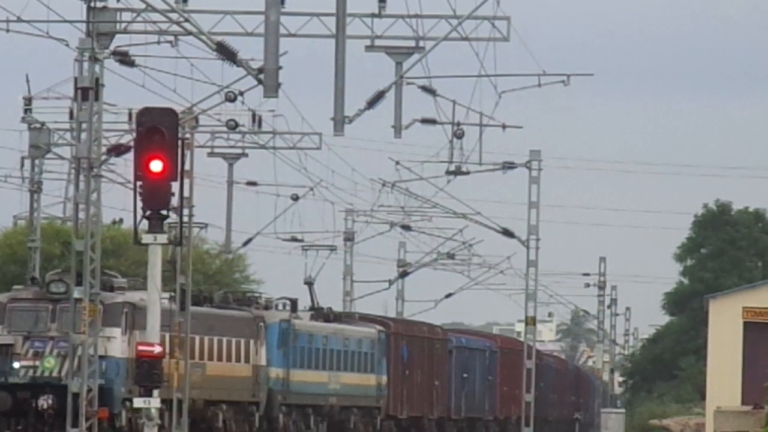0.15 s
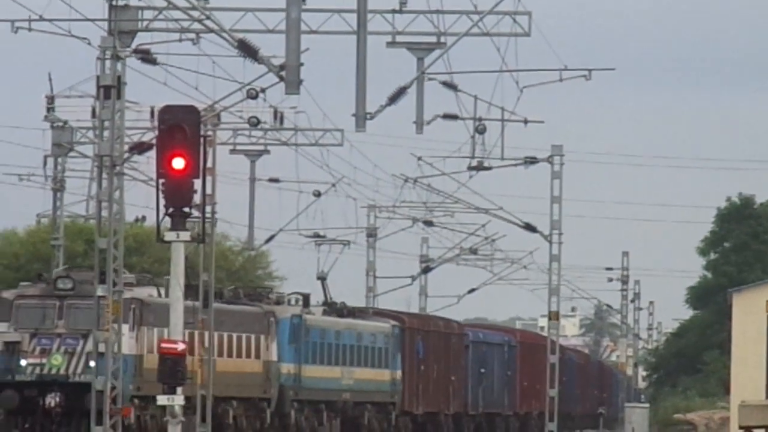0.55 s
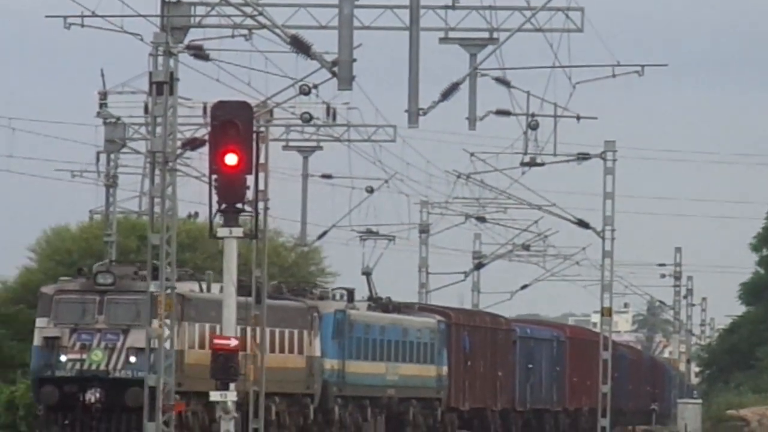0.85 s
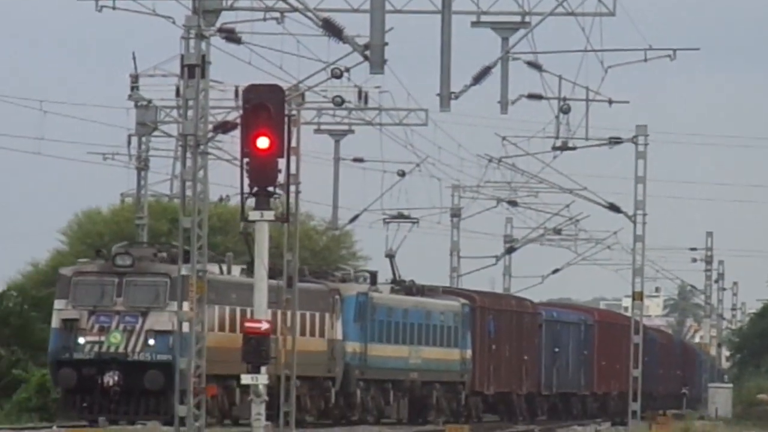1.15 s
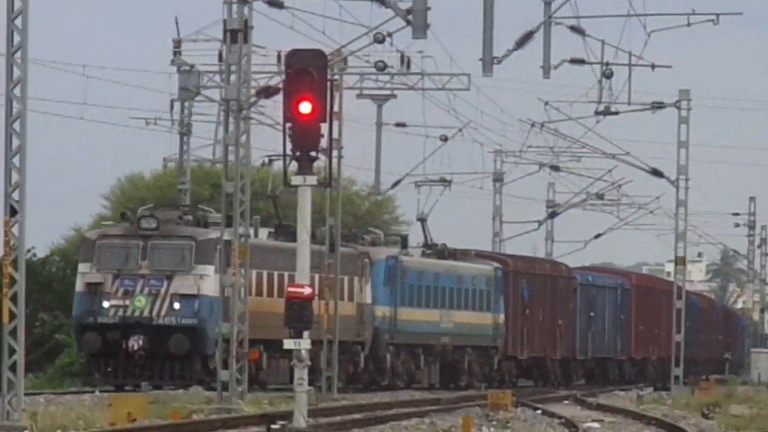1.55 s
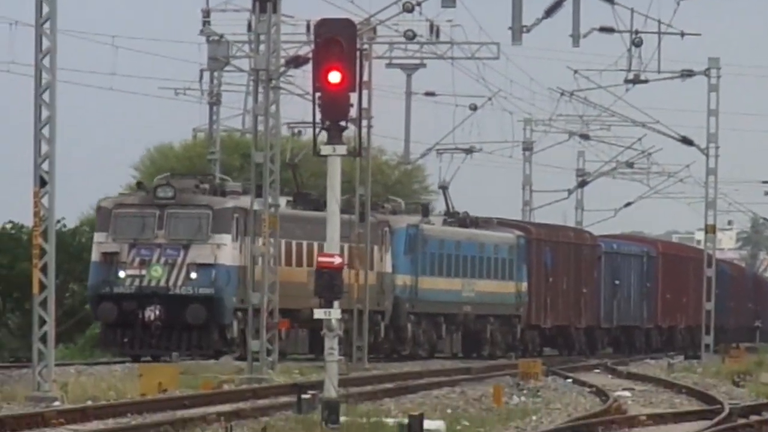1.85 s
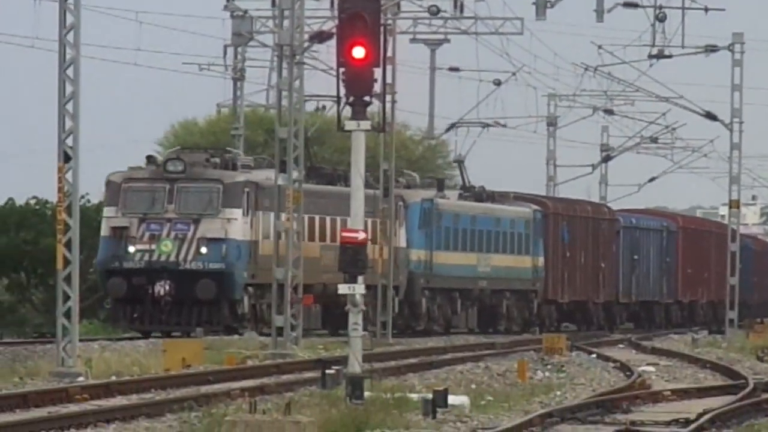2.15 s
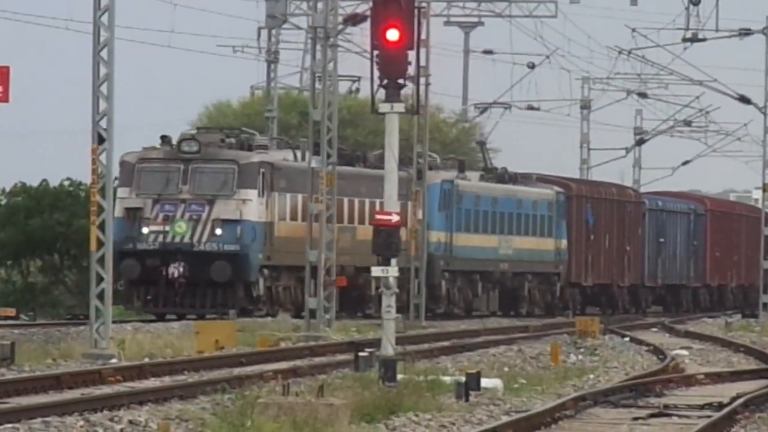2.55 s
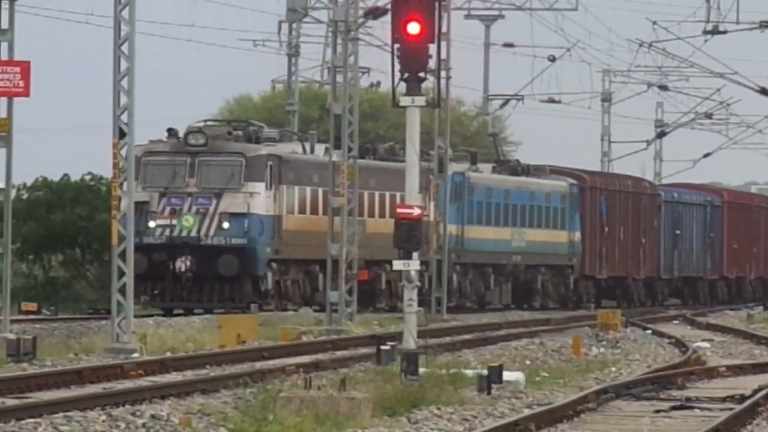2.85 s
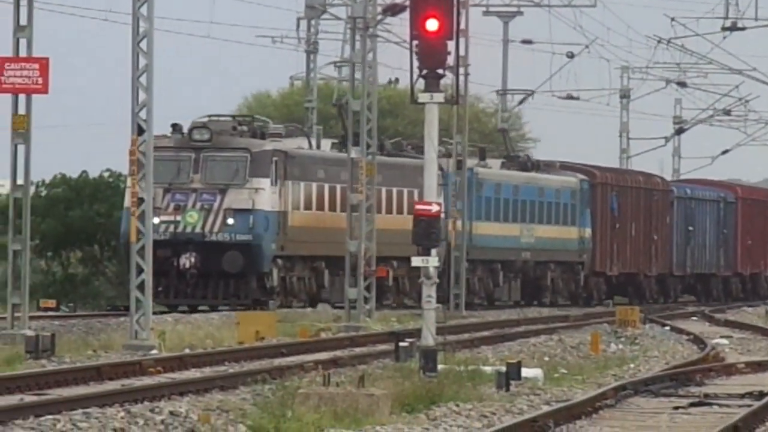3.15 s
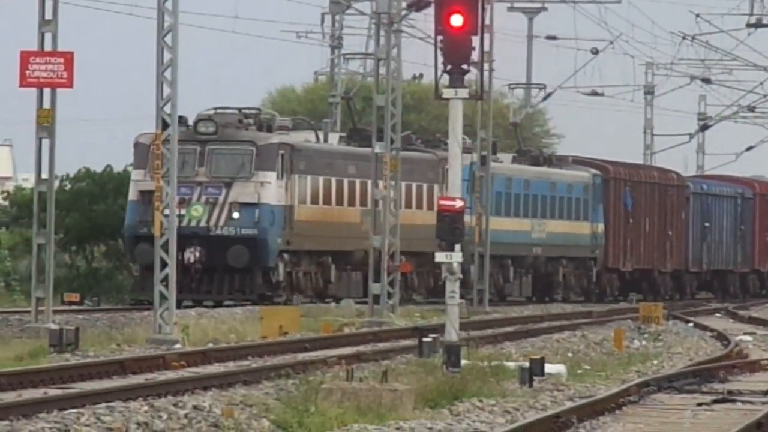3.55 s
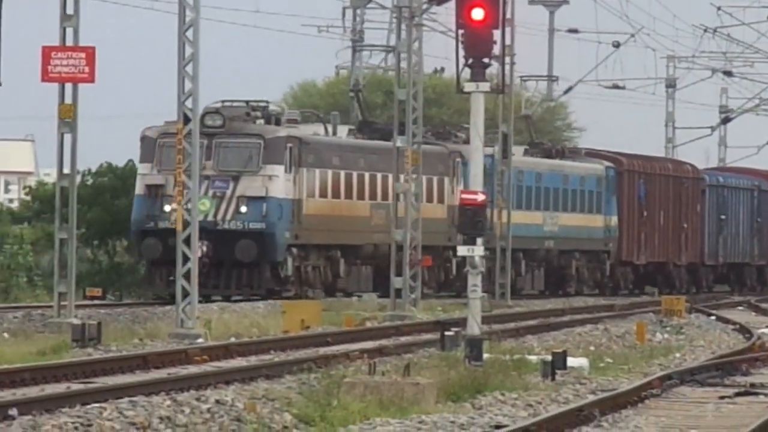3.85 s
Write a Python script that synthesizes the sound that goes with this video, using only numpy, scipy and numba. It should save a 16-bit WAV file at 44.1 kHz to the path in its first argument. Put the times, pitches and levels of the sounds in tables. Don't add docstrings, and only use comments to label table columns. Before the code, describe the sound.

A goods locomotive's air horn bursts in after half a second of faint bird chirps and hiss, holds one long brassy note, dips twice and swells back, echoing across open track while wind buffets the microphone.

```python
import sys
import numpy as np
from scipy import signal
from scipy.fft import rfft, irfft
from scipy.io import wavfile
from scipy.ndimage import uniform_filter1d, map_coordinates
from numba import njit

SR = 44100
rng = np.random.default_rng(int(sys.argv[2]) if len(sys.argv) > 2 else 0)


def rack_gain(trim_db):
    fader = np.asarray(trim_db, float)
    return 10 ** (fader / 20)


def log_audio(samples):
    frames = np.atleast_2d(samples).T
    limited = np.clip(frames, -1, 1)
    pcm = np.round(limited * 32767).astype(np.int16)
    wavfile.write(sys.argv[1], SR, pcm)


N = 176400
OPEN_S = .58

# (time [s], pitch [Hz], level [dB], brightness [dB])
HORN_BLOWING = [(.6, 291.5, -15.5, -30), (.66, 289.2, -14.5, -28), (1.3, 288.8, -15, -23),
                (1.8, 288.7, -16, -22), (2.1, 288.7, -14, -17), (2.3, 288.5, -11.5, -19),
                (2.64, 288.9, -10.8, -16), (2.77, 292.5, -15, -19), (2.87, 295.2, -18.5, -38),
                (2.98, 297.3, -24, -66), (3.035, 292.5, -11, -20), (3.12, 290.3, -9, -17),
                (3.36, 289.2, -8.3, -17), (3.48, 291.8, -12.5, -19), (3.59, 294.8, -19, -34),
                (3.655, 291.8, -12.5, -20), (3.82, 289.5, -11.5, -18), (3.99, 288.6, -11.5, -18)]
# (overtone number, level [dB])
BELL_COLOUR = [(1, -13), (2, -16), (3, 3.5), (4, 1), (5, -8.5), (6, -11.5), (7, -7), (8, -7.5), (9, -13),
               (10, -11.5), (11, -9.5), (12, -13), (13, -11), (14, -10.5), (15, -11.5), (16, -17),
               (18, -15), (22, -22), (25, -24.5), (28, -32.5), (52, -52)]
# (time [s], notch [Hz], notch gain [dB], lobe [Hz], lobe gain [dB])
MOVING_COLOUR = [(.62, 1700, 3.5, 3330, 15), (.82, 1750, 2, 3400, 8.5), (.97, 870, -1.5, 2870, 2.5),
                 (1.12, 1180, 1, 2350, 3.5), (1.4, 840, -5, 2360, 4.5), (1.55, 820, -3, 2870, -0.5),
                 (1.7, 1110, -7.5, 2750, 4), (1.87, 915, -6.5, 3250, 2), (2.02, 930, -12, 3600, 5),
                 (2.2, 970, -3, 3470, 1), (2.45, 1240, -9.5, 3240, 6), (2.62, 1180, -4.5, 3050, 4.5),
                 (2.8, 1270, -7.5, 4030, 3), (3.05, 1293, -18, 4280, 2), (3.2, 1304, -27.5, 3660, 2.5),
                 (3.4, 1286, -13.5, 3700, 10.5), (3.65, 1340, -4.5, 4030, 7.5), (3.9, 1410, -3, 3230, 5.5)]
# (delay [s], growth [s/s], level [dB], low-pass [Hz])
REFLECTIONS = [
    (.0015, 0.000079, -15, 9000),
    (.045, .003, -26, 4000),
    (.11, 0.0085, -18, 3000),
    (.23, .004, -16, 2500),
    (.36, .004, -17.5, 2000),
]
# (time [s], level [dB])
GUST_LEVEL = [(0, -56), (.08, -41.5), (.42, -82), (.49, -40), (.62, -53), (.8, -35.5), (1.14, -39),
              (1.28, -19), (1.35, -34), (1.5, -22.5), (1.8, -24), (1.9, -33.5), (2.14, -35.5), (2.3, -25),
              (2.8, -26), (3.17, -36.5), (3.8, -27.5), (3.88, -22)]
# (frequency [Hz], density [dB/Hz])
WIND_COLOUR = [(25, -26), (60, -8.5), (120, -3.5), (200, 4), (320, -3.5), (500, -19), (800, -21.5),
               (1500, -26.5)]
# (time [s], peak level [dB], centre [Hz])
AIR_THUMPS = [(.068, -37, 155), (.186, -47, 110), (0.441, -37, 190), (.472, -33, 125), (0.488, -29, 208),
              (0.504, -31, 157), (.553, -40, 110), (2.224, -17.5, 275), (2.278, -13, 300), (2.39, -13, 298),
              (2.69, -18.5, 380), (2.738, -14.5, 302), (3.643, -22.5, 286), (.98, -27, 100),
              (1.89, -26, 110), (2.88, -29, 130), (3.3, -32, 400), (0.736, -59, 285), (0.793, -22.5, 145),
              (0.845, -35, 221), (1.034, -23, 208), (1.082, -21, 114), (1.235, -34, 183), (1.377, -23, 175),
              (1.422, -18, 220), (1.471, -13, 235), (1.514, -12.5, 224), (1.595, -13, 280),
              (1.648, -11, 258), (1.719, -16.5, 182), (1.784, -9.5, 166), (2.027, -22, 184.2),
              (2.175, -10.5, 257), (2.332, -16.5, 216), (2.36, -13, 212.3), (2.463, -16.5, 265),
              (2.502, -24, 240), (2.571, -14.5, 202), (2.71, -17, 297), (2.778, -14, 190),
              (2.845, -24, 290), (3.019, -14, 224), (3.473, -22.5, 198), (3.745, -11, 268),
              (3.862, -6.5, 244), (3.942, -46, 519), (3.94, -5, 288)]
# (start [s], length [s], from [Hz], to [Hz], level [dB])
BIRD_SWEEPS = [(.012, .024, 5450, 4260, -45), (.028, .028, 4500, 3100, -62), (.06, .016, 3700, 4100, -52),
               (.07, .016, 4000, 5200, -50), (.08, .014, 5050, 5500, -45), (.09, .012, 5500, 6100, -57),
               (.21, .021, 3850, 4400, -58), (.315, .02, 5530, 4320, -56), (0.33, 0.027, 3820, 3000, -54),
               (.342, .026, 5350, 3700, -47), (0.364, .022, 3550, 4200, -49),
               (0.385, .022, 3550, 5000, -50), (.404, 0.019, 4930, 5550, -47),
               (0.42, .012, 5400, 6000, -55), (0.56, 0.014, 4140, 4420, -52), (0.89, 0.16, 1180, 1410, -41),
               (1.99, .08, 3560, 3000, -39)]
# (centre [Hz], width [Hz], throb rate [1/s], level [dB])
INSECT_BANDS = [(9070, 540, 105, -64.5), (6460, 1200, 330, -66)]
# (frequency [Hz], level [dB])
HUM_TONES = [(495.3, -60), (1276, -63), (2541, -63)]
# (frequency [Hz], density [dB/Hz])
HISS_COLOUR = [(24, -51), (40, 2), (392, -15.5), (490, -12), (527, -10.5), (1290, -12.5), (1920, -20.5),
               (2450, -20), (15000, -32.5)]
# (from [s], to [s], level [dB])
CHANNEL_PARTING = [(.5, .55, -68), (.61, .66, -62), (1.112, 1.302, -53), (1.432, 1.667, -51.5),
                   (2.01, 2.54, -45.5), (2.67, 2.775, -44.5), (3.056, 3.128, -50.5), (3.221, 3.564, -45),
                   (3.617, 3.728, -56), (3.798, 3.951, -45.5)]
# (frequency [Hz], density [dB/Hz])
PARTING_COLOUR = [(24, -35), (40, -12), (1000, -14.5), (1170, -19), (2170, -18), (5850, -15.5),
                  (15000, -32)]
LIMITER_SNAPS = [3.138, 3.205, 3.277, 3.346]


def level(x, db):
    return x * rack_gain(db) / np.sqrt(np.mean(x ** 2))


def curve(table, col):
    a = np.array(table)
    return np.interp(np.arange(N) / SR, a[:, 0], a[:, col])


def walk(rate):
    hold = int(SR / rate)
    steps = np.repeat(rng.standard_normal(N // hold + 1), hold)
    return 1.164 * uniform_filter1d(uniform_filter1d(steps, hold), hold)[:N]


def band(x, hz, width):
    return signal.lfilter(*signal.iirpeak(min(hz, .45 * SR), hz / width, fs=SR), x)


def bands(colour, flick_db, rate, count):
    p = np.array(colour)
    f = np.fft.rfftfreq(N, 1 / SR) + 1
    spectrum = rfft(rng.standard_normal(N)) * rack_gain(np.interp(np.log(f), np.log(p[:, 0]), p[:, 1]))
    half_octaves = 2 * np.log2(f / 25)
    out = 0
    for k in range(count):
        window = np.cos(np.pi / 2 * np.clip(half_octaves - k, -1, 1)) ** 2
        out = out + rack_gain(flick_db * walk(rate)) * irfft(spectrum * window, N)
    return out


def horn(t):
    attack_s, start_hz, jitter_hz = .024, 5, .08
    shimmer_db, flutter_db, grain_db = 1.5, 2.2, 4
    wobble, lean = .3, .65
    smear = .1
    since = np.maximum(t - OPEN_S, 0)
    onset = np.exp(-since / attack_s)
    hz = curve(HORN_BLOWING, 1) + start_hz * onset + jitter_hz * walk(30.33)
    phase = 2 * np.pi * np.cumsum(hz) / SR
    bright = curve(HORN_BLOWING, 3) + 17 - 40 * onset
    shimmer = np.array([walk(5) for _ in range(14)])
    flutter = flutter_db * np.array([walk(15) for _ in range(9)])
    grain = grain_db * np.array([walk(60) for _ in range(11)])
    notch_hz, notch_db, lobe_hz, lobe_db = (curve(MOVING_COLOUR, c) for c in range(1, 5))
    bell = np.array(BELL_COLOUR)
    ripple = 1.55 * rng.standard_normal(53)
    tone, power = 0, 0
    for k in range(1, 53):
        db = np.interp(k, bell[:, 0], bell[:, 1]) + ripple[k] * (k > 22)
        db = db + notch_db * np.exp(-((k * hz - notch_hz) / 137) ** 2)
        db = db + lobe_db * np.exp(-((k * hz - lobe_hz) / 386) ** 2)
        gain = rack_gain(db + .88 * bright * min(k / 25, 1.6))
        power = power + gain ** 2 / 2
        shake_db = (shimmer_db * shimmer[k % 14] + flutter[k % 9]) * (1 + smear * max(k - 12, 0)) ** .5
        shake_db = shake_db + grain[k % 11] * np.clip(k / 12 - 1.5, 0, 1)
        drift = wobble * shimmer[(3 * k + 5) % 14] * (1 + smear * np.clip(k - 5, 0, 12))
        tone = tone + gain * rack_gain(shake_db) * np.sin(k * (phase + np.pi) + np.pi - lean + drift)
    air = band(band(rng.standard_normal(N), 1900, 4500), 1900, 4500)
    air = rack_gain(-38) * (1 + np.cos(phase)) * level(air, 0)
    env = rack_gain(curve(HORN_BLOWING, 2) - .37) * np.clip(since / attack_s, 0, 1) ** 2
    return env * (tone / np.sqrt(power) + air)


def squeal(t):
    start_s, length_s, hz, fall = .495, .095, 1600, .025
    u = np.clip((t - start_s) / length_s, 0, 1)
    phase = 2 * np.pi * np.cumsum(hz * (1 - fall * u)) / SR
    whistle = np.sin(phase) + .82 * np.sin(2 * phase) + band(rng.standard_normal(N), 2700, 2500)
    return rack_gain(-44.5 + 2 * walk(34.5)) * np.sin(np.pi * u) ** .5 * whistle


def reflections(blast, t):
    out = 0
    for delay, growth, db, hz in REFLECTIONS:
        late = map_coordinates(blast, [(t - delay - growth * (t - 2)) * SR], order=3)
        out = out + rack_gain(db) * signal.lfilter(*signal.butter(4, hz, fs=SR), late)
    return out


@njit
def walls(x, lags, gain, damp):
    line, soft, out = np.zeros((8, 8192)), np.zeros(8), np.zeros(len(x))
    for i in range(len(x)):
        total = 0.
        for k in range(8):
            soft[k] += (1 - damp) * (gain[k] * line[k, (i - lags[k]) & 8191] - soft[k])
            total += soft[k]
        out[i] = soft[0] - soft[3] + soft[5] - soft[6]
        for k in range(8):
            line[k, i & 8191] = x[i] + soft[k] - total / 4
    return out


def reverberation(blast):
    t60_s = 1.8
    lags = rng.integers(1500, 8000, 8)
    return rack_gain(-15) * walls(blast, lags, rack_gain(-60 * lags / SR / t60_s), .82)


def wind():
    rumble = bands(WIND_COLOUR, 1, 35, count=13) * rack_gain(4.5 * walk(30))
    return level(rumble, 0) * rack_gain(curve(GUST_LEVEL, 1))


def thumps(t):
    width_s = .0074
    air = signal.lfilter(*signal.butter(4, 850, fs=SR), rng.standard_normal(N))
    out = 0
    for s, db, hz in AIR_THUMPS:
        shape = np.exp(-((t - s - width_s) / width_s) ** 2)
        puff = shape * band(band(air, hz, hz), hz, hz * .79)
        out = out + rack_gain(db - 3) * puff * np.sqrt(np.sum(shape ** 2) / np.sum(puff ** 2))
    return out


def birds(t):
    out = 0
    for s, length, from_hz, to_hz, db in BIRD_SWEEPS:
        u = np.clip((t - s) / length, 0, 1)
        cycles = length * (from_hz * u + (to_hz - from_hz) * u ** 2 / 2)
        out = out + rack_gain(db) * np.sin(np.pi * u) * np.sin(2 * np.pi * cycles)
    out = out * rack_gain(-3 + 1.5 * walk(180))
    return out + .25 * np.roll(out, 300)


def insects(t):
    out = 0
    for hz, width, rate, db in INSECT_BANDS:
        throb = (1 + np.sin(2 * np.pi * rate * t + 2 * walk(5))) ** 2
        out = out + level(band(band(throb * rng.standard_normal(N), hz, width), hz, width), db)
    return out


def motor_hum(t):
    out = 0
    for hz, db in HUM_TONES:
        out = out + rack_gain(db + 2.5 + 3.6 * walk(7.2)) * np.sin(2 * np.pi * hz * t + walk(4.9))
    return out


def distant_hiss():
    return level(bands(HISS_COLOUR, 1.5, 6.2, count=20), -47.5)


def channel_difference(t):
    gate = sum(rack_gain(db) * ((t > a) & (t < b)) for a, b, db in CHANNEL_PARTING)
    return uniform_filter1d(gate, size=500) * level(bands(PARTING_COLOUR, 1.5, 25.45, count=20), 0)


def scene():
    t = np.arange(N) / SR
    blast = horn(t)
    heard = blast + squeal(t) + reflections(blast, t) + reverberation(blast)
    field = insects(t) + motor_hum(t) + distant_hiss()
    ducked = field * rack_gain(-9 * (t > OPEN_S))
    mid = heard + wind() + thumps(t) + birds(t) + ducked
    side = channel_difference(t)
    return np.array([mid + side, mid - side])


def top_cut(x):
    return signal.sosfilt(signal.butter(12, 15580, fs=SR, output="sos"), x)


def record(dry):
    snap_db, recovery_s = -2.3, .045
    knee, room = .88, .15
    t = np.arange(N) / SR
    limiter_db = sum(snap_db * (t > s) * np.exp(-np.abs(t - s) / recovery_s) for s in LIMITER_SNAPS)
    x = dry * rack_gain(limiter_db)
    rounded = np.sign(x) * (knee + room * np.tanh((np.abs(x) - knee) / room))
    x = np.where(np.abs(x) < knee, x, rounded)
    x = signal.sosfilt(signal.ellip(6, .2, 40, 14950, fs=SR, output="sos"), x)
    return top_cut(np.clip(x, -1, 1))


dry = scene()
out = record(dry)
log_audio(out)
```